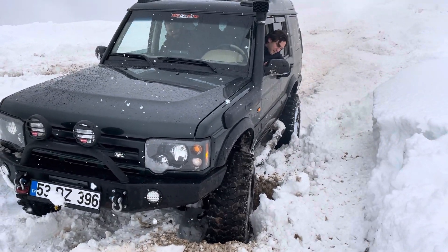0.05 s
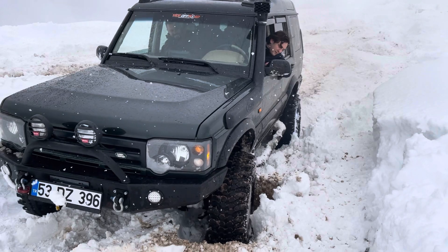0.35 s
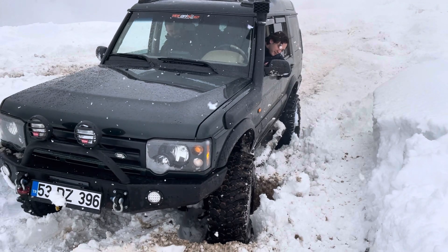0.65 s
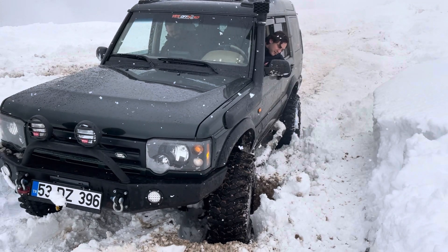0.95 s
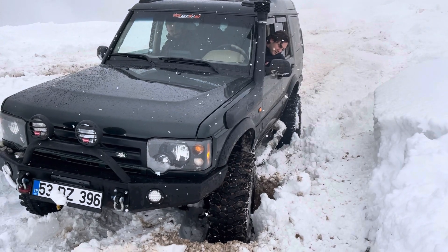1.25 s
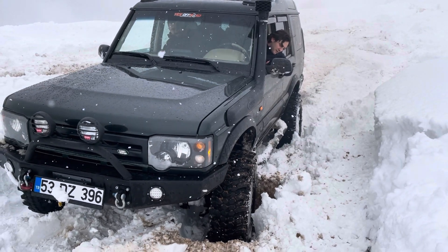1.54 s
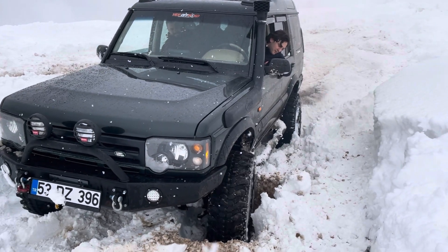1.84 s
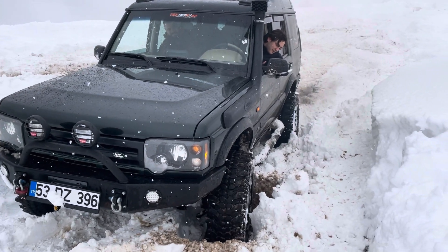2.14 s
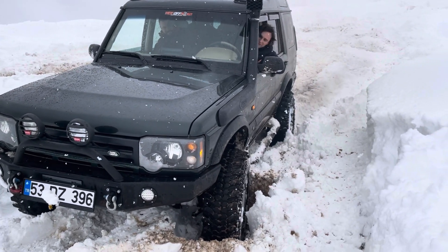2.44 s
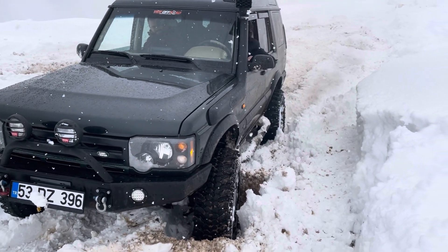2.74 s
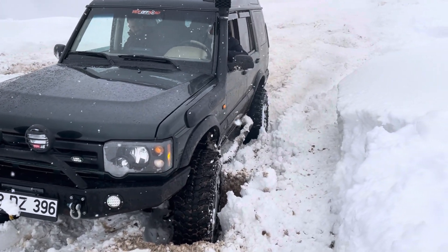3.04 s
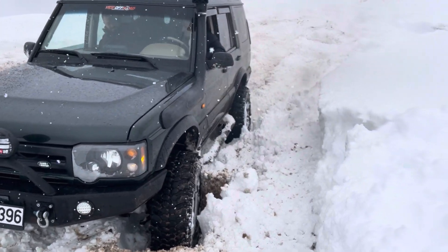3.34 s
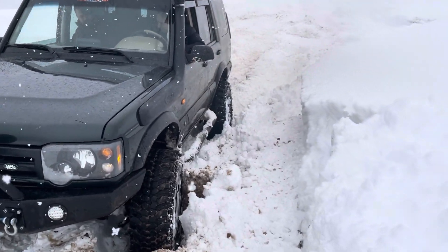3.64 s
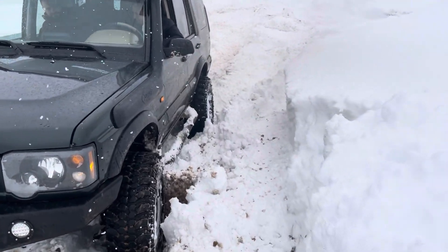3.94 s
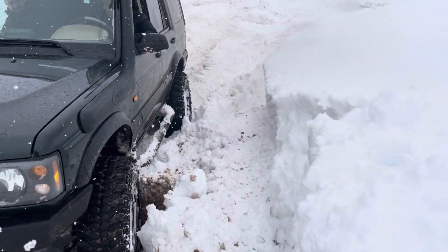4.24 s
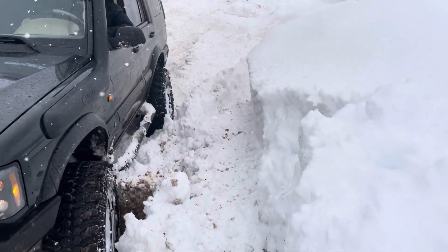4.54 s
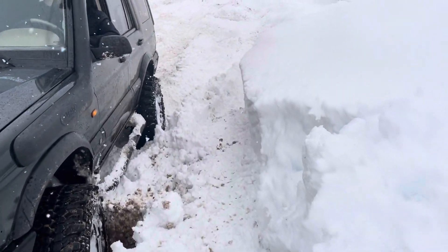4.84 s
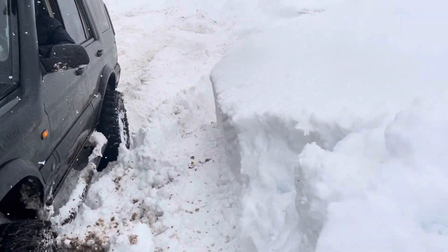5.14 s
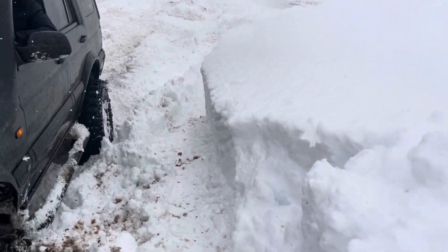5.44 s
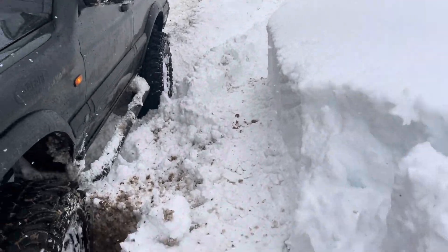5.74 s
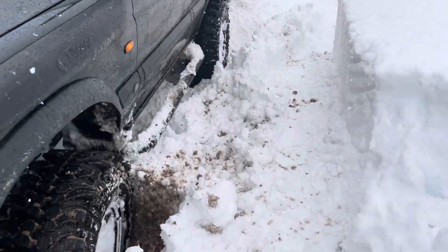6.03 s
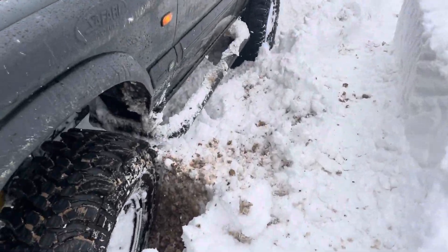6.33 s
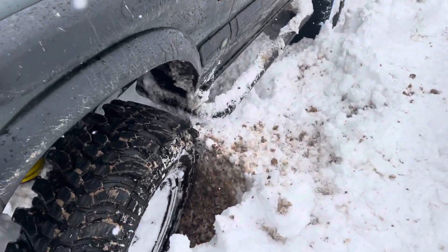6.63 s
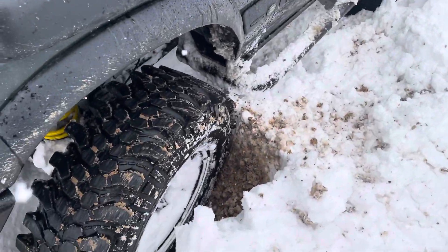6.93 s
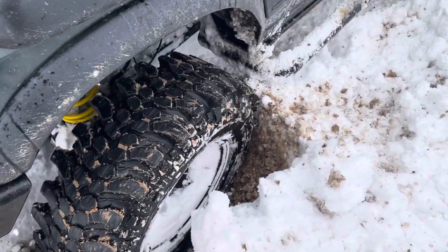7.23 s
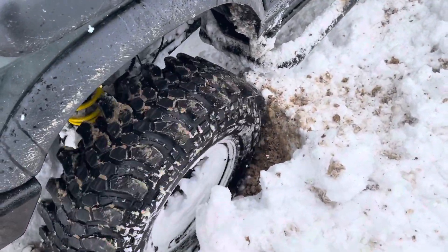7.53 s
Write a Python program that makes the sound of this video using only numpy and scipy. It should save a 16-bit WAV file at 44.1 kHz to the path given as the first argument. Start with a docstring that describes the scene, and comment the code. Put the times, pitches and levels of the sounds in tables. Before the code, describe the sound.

Close to the front of an off-road vehicle in snow, a diesel engine gives a short rev and then a slower, higher one, with gritty tyre spray and knocks underneath. It drops to a loping, clattering idle with scattered soft thuds and a few light ticks. As the microphone nears the front wheel, a last long rev builds with a deep boom, a faint hoarse whine, spinning tyres and heavy thumps of thrown snow.

```python
"""A five-cylinder diesel four-wheel-drive is stuck in deep snow. It is revved twice: the exhaust booms at
the firing rate, the block knocks, fan and intake hiss, and spinning tyres throw snow at the underbody.
It runs down with a brief whine, sags twice and idles, with one faint touch of the accelerator, while the
two-port microphone moves from the grille to the wing. Last it pulls long and hard, tyres spinning
again and clods thumping, as the microphone moves on towards the front wheel arch."""
import sys
import numpy as np
from scipy import signal
from scipy.fft import rfft, irfft, next_fast_len
from scipy.io import wavfile
from scipy.ndimage import uniform_filter1d, map_coordinates

SR = 44100
rng = np.random.default_rng(int(sys.argv[2]) if len(sys.argv) > 2 else 0)


def transcribe(u):
    """Save the signal u as a 16-bit wav file named by the first command-line argument.

    u: samples, shape (n,) or (channels, n), limited to [-1, 1]; the rate is SR.
    q: integer samples, one column per channel.
    """
    v = np.clip(np.atleast_2d(u).T, -1, 1)
    q = np.round(v * 32767).astype(np.int16)
    wavfile.write(sys.argv[1], SR, q)


N = 334278
TIME = np.arange(N) / SR

# accelerator presses: down t/s, up t/s, goal firing rate f/Hz, rise time constant t/s
PRESSES = [(-.087, .358, 77.435, .042), (.991, 1.867, 91.254, .733), (4.071, 4.706, 34.949, .049),
           (5.864, 7.7, 70.641, .488)]
# idle sags: t/s, depth f/Hz
SAGS = [(2.426, 6.319), (2.849, 3.051)]
IDLE_HZ, COAST_S, FRICTION_HZ, SAG_S = 31.654, .287, 4.99, .135


def firing_rate():
    """Firings per second: each press pulls the speed towards its goal, friction brings it back to idle."""
    above_idle = np.zeros(N)
    for down, up, goal_hz, rise_s in PRESSES:
        gained = (goal_hz - IDLE_HZ) * (1 - np.exp(-np.clip(TIME - down, 0, up - down) / rise_s))
        above_idle = np.maximum(above_idle, (gained + FRICTION_HZ) * release(up, COAST_S) - FRICTION_HZ)
    return IDLE_HZ + above_idle - sum(depth * bump(s, SAG_S) for s, depth in SAGS)


# per press: share of full load
PRESS_LOADS = [1, 0.77, 0.01, 0.72]
LOAD_LEAD_S, LOAD_ATTACK_S, LOAD_RELEASE_S = 0.05, 0.045, 0.34
GOVERNOR_LAG_S, GOVERNOR_LOAD_PER_HZ = .19, 0.032
OVERRUN_HZ_PER_S = 55


def engine_state(rate):
    """Level-law inputs. Fuel comes on fast, ebbs slowly, puffs after a sag and is cut by fast slowing."""
    load = sum(share * progress(down - LOAD_LEAD_S, down + LOAD_ATTACK_S) * release(up, LOAD_RELEASE_S)
               for (down, up, *_), share in zip(PRESSES, PRESS_LOADS))
    load += sum(GOVERNOR_LOAD_PER_HZ * depth * bump(s + GOVERNOR_LAG_S, SAG_S / 2) for s, depth in SAGS)
    slowing = -np.gradient(rate) * SR / OVERRUN_HZ_PER_S
    overrun = uniform_filter1d(np.clip(slowing, 0, 1), size=3000)
    octaves = np.log2(rate / IDLE_HZ)
    return np.array([np.ones(N), octaves, load, overrun, progress(*TO_WING_S), progress(*TO_ARCH_S)])


def law_gain(law, state):
    """Gain from a law's dB terms: at idle, per octave of speed, full load, overrun, wing, arch."""
    return amp(np.dot(law, state))


# silencer response: f/Hz, level/dB
SILENCER = [(25, -46), (33, -37), (41, -31.5), (48, -22.5), (57, -17), (65, -13), (74, -13.5), (83, -19),
            (95, -23.5), (105, -24), (114, -29.5), (135, -33), (157, -36.5), (190, -72), (260, -50.5),
            (330, -64.5)]
# cylinder strength in firing order: level/dB
CYLINDER_DB = [-0.6, -1.4, -0.8, -0.1, -2.2]
# level laws, terms as in law_gain: level/dB
BOOM_LAW_DB = (-12, 2, 12.5, -8, 4, -1)
RUMBLE_LAW_DB = (-37, -0.5, 8, 1.5, -0.5, 8)


def exhaust(rate, turn, idle, state, lope=1.18, waver_db=1.35, upper_db=-6, fourth_db=-5):
    """Firing orders swell through the silencer's resonance; unequal cylinders make the idle lope."""
    orders = np.arange(1, 9)[:, None]
    load = state[2]
    order_db = along(SILENCER, orders * rate)
    order_db += upper_db * load * (orders > 2)  # load feeds mainly the two lowest orders
    order_db += fourth_db * idle * (orders == 4)
    boom = np.sqrt(2) * np.sum(amp(order_db) * np.cos(2 * np.pi * orders * (turn - .48)), axis=0)
    cylinder_db = np.interp(turn, np.arange(len(CYLINDER_DB)), CYLINDER_DB, period=len(CYLINDER_DB))
    uneven = amp(idle * lope * cylinder_db + (idle - 0.4) * waver_db * wobble(11))
    rumble_spectrum = [(15, -34), (35, 0), (52, 13.5), (76, 16), (120, 3), (170, -16), (300, -81)]
    rumble = coloured(rng.standard_normal(N), rumble_spectrum)
    return law_gain(BOOM_LAW_DB, state) * boom * uneven + law_gain(RUMBLE_LAW_DB, state) * rumble


# growl spectra: f/Hz, level/dB
GROWL_GRILLE_IDLE = [(100, -38), (160, 4), (185, -8.5), (220, 0), (275, 3), (350, -6), (390, -5), (520, -3),
                     (760, -4), (900, -13), (1250, -63.5)]
GROWL_GRILLE_REVVED = [(88, -11.5), (150, -3.5), (188, -5.5), (242, -1), (376, -6.5), (439, -16),
                       (562, -8.5), (740, -11.5), (950, -20.5), (1240, -31), (2090, -120)]
GROWL_SIDE_IDLE = [(100, -22), (160, -2), (220, -0.5), (380, -2.5), (480, -5), (740, -10.5), (900, -27.5),
                   (1250, -73)]
GROWL_SIDE_REVVED = [(100, -18), (160, 0), (192, -7), (222, 1), (290, 0.5), (370, -6), (415, -6),
                     (653, -11), (717, -12.5), (782, -16), (950, -34), (1240, -45), (2090, -120)]
# level law: level/dB
GROWL_LAW_DB = (-40.5, 6, 3, 2.5, 3, 9.5)


def body_growl(rate, turn, idle, state):
    """Each firing shakes the body; the floor pan's drone joins in above idle."""
    shakes = firings(turn, CYLINDER_DB, delay=.13, spread_s=.0015, decay_s=.017,
                     scatter_db=-.5, jitter_s=.0004)
    growl = chuff(shakes, share=0.22) + amp(-14 - 3.1 * idle) * cycle_rasp(turn)
    growl = voiced(growl, rate, GROWL_GRILLE_IDLE, GROWL_GRILLE_REVVED, GROWL_SIDE_IDLE, GROWL_SIDE_REVVED)
    drone = grille_to_side(amp(-14), amp(-2)) * (1 - idle) * floor_drone(rate, turn)
    return law_gain(GROWL_LAW_DB, state) * (growl + drone)


def cycle_rasp(turn, points=400):
    """Unequal cylinders repeat one ragged pressure pattern every five firings."""
    pattern = irfft(np.exp(2j * np.pi * rng.random(points // 2 + 1)), points)
    return unit(map_coordinates(pattern, [turn / len(CYLINDER_DB) % 1 * points], mode="grid-wrap"))


# uneven orders: multiple of the firing rate, level/dB
DRONE_ORDERS = [(3.2, -6), (3.8, 3.5), (4, -1), (4.4, -7), (4.6, -8), (5, -4), (5.6, -8)]
# floor pan modes: f/Hz, half width f/Hz, level/dB
FLOOR_MODES = [(218, 10, -1), (250, 18, -1), (300, 16, -5), (385, 12, -10)]


def floor_drone(rate, turn):
    """Uneven firing orders sing out in turn as they climb through the floor pan's resonances."""
    hz = np.arange(600)
    power = sum(amp(db) ** 2 / (1 + ((hz - centre) / width) ** 4) for centre, width, db in FLOOR_MODES)
    wavering = lambda k: amp(3 * wobble(6)) * np.sin(2 * np.pi * k * turn + .35 * wobble(8))
    return sum(np.interp(k * rate, hz, np.sqrt(2 * power)) * amp(db) * wavering(k)
               for k, db in DRONE_ORDERS)


# knock spectra: f/Hz, level/dB
KNOCK_GRILLE_IDLE = [(500, -52), (850, -30), (981, -7), (1080, -6.5), (1540, -4), (1720, -12.5),
                     (2000, -27.5), (2600, -59), (4400, -120)]
KNOCK_GRILLE_REVVED = [(500, -28), (850, -17), (927, -12.5), (1090, 7.5), (1190, 0), (1370, 2), (1500, 8),
                       (2100, -12.5), (2730, -49), (4620, -120)]
KNOCK_SIDE_IDLE = [(600, -45), (900, -5), (1100, -5), (1300, -0.5), (1550, -5), (1900, -16), (2500, -68)]
KNOCK_SIDE_REVVED = [(500, -31), (850, -1), (1110, 5), (1340, 0), (1590, -5), (2100, -4), (2730, -38),
                     (4620, -120)]
# knock per cylinder in firing order: level/dB
CYLINDER_KNOCK_DB = [2.5, 8, 5.5, 5, 6]
# level law: level/dB
KNOCK_LAW_DB = (-40, 3, 1.5, -3.5, -2.5, 6.5)
SCREEN_AT_S, SCREEN_S, SCREEN_DB = 5.72, 0.33, -3.5


def block_knock(rate, turn, idle, state):
    """Firings ring the block: separate clacks at idle, a blur when revved or with the fuel cut."""
    overrun = state[3]
    crisp = idle * (1 - overrun)
    bangs = firings(turn, CYLINDER_KNOCK_DB, delay=.08, spread_s=.0013, decay_s=.011,
                    scatter_db=.8, jitter_s=.0004)
    knock = chuff(bangs, share=0.33 + 0.27 * crisp)
    knock = voiced(knock, rate, KNOCK_GRILLE_IDLE, KNOCK_GRILLE_REVVED, KNOCK_SIDE_IDLE, KNOCK_SIDE_REVVED)
    knock = amp(-3.3 * crisp) * knock + amp(-6 + 5.3 * crisp) * casting_clatter(turn)
    screen = amp(SCREEN_DB * bump(SCREEN_AT_S, SCREEN_S))  # the wing briefly screens the block
    return law_gain(KNOCK_LAW_DB, state) * screen * knock


# casting modes: f/Hz, grille level/dB, wing level/dB, t60/s
CASTING_MODES = [(756.4, -11.5, -10.5, 0.099), (1155, -2, -5.5, 0.027), (1281, -0.5, -2.5, 0.027),
                 (1359, -5, 0.5, 0.025), (1504, -2.5, -11, 0.06), (1694, -6, -36, 0.028),
                            (2258, -17.5, -12, 0.035), (3213, -21, -13.5, 0.031),
                 (4350, -23.5, -16.5, 0.03)]


def casting_clatter(turn, attack_s=0.003):
    """Every firing rings the modes of the castings, each time at a slightly different pitch."""
    t, clatter = TIME[:SR // 12], 0
    for hz, grille_db, wing_db, t60 in CASTING_MODES:
        ring = amp(-60 * t / t60) * np.exp(2j * np.pi * hz * t) * (1 - np.exp(-t / attack_s))
        blows = pulses(turn, CYLINDER_KNOCK_DB, delay=.055, scatter_db=1.6, jitter_s=.0004)
        blows *= amp(grille_to_side(grille_db, wing_db))
        detune = np.exp(3j * wobble(30))
        clatter += (signal.oaconvolve(blows, ring)[:N] * detune).imag
    return steady(clatter)


# hiss spectra: f/Hz, level/dB
HISS_GRILLE_IDLE = [(1120, -19), (1900, -3), (2260, 1), (2800, -4.5), (3220, -5.5), (4300, -6), (5590, -14),
                    (7280, -16.5), (8160, -45), (8520, -90), (9390, -29), (10100, -23), (12200, -11.5),
                    (15500, -35)]
HISS_GRILLE_REVVED = [(1120, -22), (1900, -22), (2060, 1), (2650, 2.5), (6960, -10.5), (8160, -16.5),
                      (8520, -78), (9060, -84), (9470, -30.5), (10200, -14), (12700, -12.5), (15500, -22)]
HISS_SIDE_IDLE = [(1120, -18), (1900, 1.5), (2260, -0.5), (2800, -5), (3220, -4), (3650, -9.5), (4350, -4),
                  (4800, -11.5), (5590, -16.5), (7280, -21), (8160, -56), (8520, -84), (9390, -26),
                  (10100, -21), (12200, -11), (15500, -37)]
HISS_SIDE_REVVED = [(1120, -27), (1900, -8), (2650, -0.5), (2920, -6), (4950, -6.5), (5640, -16.5),
                    (7090, -13), (8300, -31.5), (8670, -84), (8980, -39), (10700, -16), (12500, -17.5),
                    (15500, -26)]
# level law: level/dB
HISS_LAW_DB = (-49.5, 4.5, 1.53, -1, 3, 7)


def intake_hiss(rate, turn, idle, state):
    """Fan and intake rush in puffs; above them the injectors tick just before each firing."""
    puffs = firings(turn, CYLINDER_DB, delay=.07, spread_s=.0046, decay_s=.005,
                    scatter_db=1, jitter_s=.0008)
    rush = chuff(puffs, share=0.26 + 0.17 * idle)
    ticks = firings(turn, CYLINDER_DB, delay=-.02, spread_s=.0051, decay_s=.002,
                    scatter_db=2.7, jitter_s=.0007)
    injectors = chuff(ticks, share=0.21 + 0.23 * idle)
    hiss = crossover(rush, injectors, hz=8800)
    hiss = voiced(hiss, rate, HISS_GRILLE_IDLE, HISS_GRILLE_REVVED, HISS_SIDE_IDLE, HISS_SIDE_REVVED)
    return law_gain(HISS_LAW_DB, state) * hiss


# wheelspins: start t/s, end t/s, spray level/dB, clod level/dB
WHEELSPINS = [(-.2, .33, -48.5, -31.5), (1.283, 1.947, -48.5, -35.5), (6.071, 7.7, -48.5, -31)]
# thrown snow spectra: f/Hz, level/dB
SPRAY_SPECTRUM = [(1000, -26), (2500, -3), (4800, 1), (7200, -3), (8300, -40), (9000, -67.5), (10300, -17),
                  (12800, 0), (15500, -22)]
CLOD_SPECTRUM = [(70, -26), (150, 7.5), (300, 7.5), (600, -14.5), (1200, -23.5), (2500, -72.5)]


def tyres():
    """Spinning tyres fling a gritty spray and pelt the wheel arch with small clods."""
    spray_gain, clod_gain = 0, 0
    for start, end, spray_db, clod_db in WHEELSPINS:
        spin = gate(start, end, attack_s=.048, release_s=.16)
        spray_gain += amp(spray_db) * spin
        clod_gain += amp(clod_db) * spin
    spray = coloured(grains(per_s=3000, spread_db=3), SPRAY_SPECTRUM) * amp(3 * wobble(17))
    clods = coloured(grains(per_s=260, spread_db=0.8), CLOD_SPECTRUM)
    return spray_gain * spray + clod_gain * clods


# clod and suspension contacts: t/s, peak level/dB, f/Hz, t60/s
CONTACTS = [(.508, -22, 286, 0.04), (.577, -29.5, 480, 0.021), (1.279, -10.5, 195, 0.015),
            (1.583, -22, 372, 0.048), (1.779, -17, 620, 0.011), (1.881, -18, 170.5, 0.11),
            (2.138, -21.5, 126, 0.087), (2.915, -17, 60.6, 0.086), (3.23, -27.5, 115, .08),
            (3.852, -19, 700, 0.0036), (4.437, -22, 172, .04), (4.529, -28, 420, 0.046),
            (5.089, -27, 306, .06), (5.445, -14.5, 82.4, 0.15), (5.642, -25, 760, .015),
            (6.899, -18.5, 407, 0.056), (7.071, -8, 450, .05), (7.080, -8.5, 365, .02),
            (7.403, -7, 373, 0.066), (7.444, -8, 378, 0.026)]
# underbody modes: f/Hz, t60/s
UNDERBODY_MODES = [(62, 0.23), (119, 0.092), (218, 0.12), (365, 0.15), (478, 0.11), (640, 0.056),
                   (990, 0.059), (1306, 0.11)]
UNDERBODY_DB, FALLOFF_DB_PER_OCTAVE, FULL_CONTACT_S = -8.5, 11.5, 0.013


def underbody_thumps():
    """Each pitched contact rings the nearest underbody modes; very short ones move them less."""
    thumps = sum(blow(*contact, breadth=.6, rough=.3, attack_s=.0003) for contact in CONTACTS)
    for s, db, contact_hz, contact_s in CONTACTS:
        push = min(contact_s / FULL_CONTACT_S, 1)
        for hz, t60 in UNDERBODY_MODES:
            mode_db = db + UNDERBODY_DB - FALLOFF_DB_PER_OCTAVE * abs(np.log2(hz / contact_hz))
            thumps += push * blow(s, mode_db, hz, t60, breadth=.44, rough=2, attack_s=.0024)
    return thumps


# showers of grit: start t/s, end t/s, level/dB
GRIT_SHOWERS = [(0, .33, -38.5), (0.417, 0.453, -39), (0.511, 0.592, -32.5), (1.766, 1.846, -32),
                (7.414, 7.472, -22.5)]
# rattle spectrum: f/Hz, level/dB
GRIT_SPECTRUM = [(130, -22), (300, 7.5), (760, 2), (1000, -8.5), (1700, -6.5), (3000, -34), (7000, -68.5)]


def chassis_rattle():
    """Grit and frozen lumps hit the chassis in short showers."""
    gain = sum(amp(db) * gate(start, end, attack_s=.0087, release_s=.018)
               for start, end, db in GRIT_SHOWERS)
    return gain * coloured(grains(per_s=400, spread_db=1.5), GRIT_SPECTRUM)


# ticks: t/s, peak level/dB, f/Hz, t60/s
LIGHT_TICKS = [(0.799, -39, 5900, 0.02), (4.329, -34, 3350, .04), (4.472, -35.5, 3320, .04),
               (4.617, -36.5, 3300, .04), (4.762, -35.5, 3250, .045)]


def light_ticks():
    """A few small, high ticks ring briefly."""
    return sum(blow(*tick, breadth=.14, rough=2, attack_s=.003) for tick in LIGHT_TICKS)


# panel modes: f/Hz, half width f/Hz, level/dB
PANEL_MODES = [(384.6, 6.7, -48), (450, 11, -63)]


def panel_hum(rate, turn, waver_db=0.5):
    """Upper firing orders hum wherever they meet a panel's resonance."""
    hum = 0
    for k in range(8, 14):
        response = sum(amp(db) / (1 + ((k * rate - hz) / width) ** 2) for hz, width, db in PANEL_MODES)
        waver = amp(waver_db * wobble(5.28))
        hum += response * waver * np.sqrt(2) * np.sin(2 * np.pi * (k * turn + rng.random()))
    return hum


def gear_rattle(rate, turn, rattle_db=-51, ring_hz=3250):
    """When the engine sags below idle, slack gears chatter with every firing."""
    slack = np.clip((IDLE_HZ - rate) / 6, 0, 1) ** 2
    bursts = firings(turn, CYLINDER_DB, delay=.12, spread_s=.0018, decay_s=.006,
                     scatter_db=1.5, jitter_s=.0008)
    return amp(rattle_db) * slack * ringing(bursts * rng.standard_normal(N), ring_hz, breadth=0.25)


# whines: start t/s, end t/s, level/dB, bandwidth over pitch
METAL_WHINES = [(2.14, 2.25, -54, .03), (6.66, 7.45, -49, .065)]


def metal_whine(hz=2670):
    """A metal resonance squeals briefly as the engine runs down and sings hoarsely under load."""
    return sum(amp(db) * gate(start, end, attack_s=.05, release_s=.04)
               * ringing(rng.standard_normal(N), hz, breadth) for start, end, db, breadth in METAL_WHINES)


def pump(hz=216.6, db=-48, waver_db=2.5):
    """A small electric motor, probably the fuel pump, hums on whatever the engine's speed."""
    gain = amp(db + waver_db * wobble(4.17))
    return gain * np.sqrt(2) * np.sin(2 * np.pi * hz * TIME + .25 * wobble(4.5))


# port difference over port sum: f/Hz, level/dB
WIDTH_GRILLE = [(60, -36), (100, -8.5), (180, -18), (310, -17.5), (550, -8.5), (950, -6.5), (1650, -2),
                (2860, 1.5), (4970, -7.5), (8640, 16), (15000, -18.5)]
WIDTH_SIDE = [(60, -20), (100, -15.5), (180, -12.5), (310, -11.5), (550, -4), (950, 0), (1650, 4),
              (2860, 0), (4970, -7), (8640, 16), (15000, -20)]
# direct sound in that difference: f/Hz, power share
DIRECT_SHARE = [(200, 0.54), (1200, 0.33), (2500, 1), (5000, .3), (12000, .4)]
# left minus right: f/Hz, level/dB
BALANCE = [(60, -1), (130, 1), (290, -1), (640, 0), (1410, -3.5), (3100, 5), (6820, 0), (15000, -0.5)]
TO_WING_S, TO_ARCH_S = (3.03, 5.34), (6.16, 8.47)  # microphone moves: start, end


def microphone(direct, diffuse):
    """Direct sound reaches the left port first, so the ports' difference leads by a quarter cycle."""
    share = lambda hz: np.clip(along(DIRECT_SHARE, hz), 0, 1)
    difference = filtered(direct, lambda hz: 1j * np.sqrt(share(hz)))
    difference += filtered(diffuse, lambda hz: np.sqrt(1 - share(hz)))
    difference = grille_to_side(equalised(difference, WIDTH_GRILLE), equalised(difference, WIDTH_SIDE))
    ports = np.array([direct + difference, direct - difference])
    return filtered(ports, lambda hz: amp(np.outer([.5, -.5], along(BALANCE, hz))))


def grille_to_side(grille, side):
    """Cross-fade as the microphone moves from the grille to the wing."""
    moved = progress(*TO_WING_S)
    return grille * (1 - moved) + side * moved


def voiced(x, rate, grille_idle, grille_revved, side_idle, side_revved, from_hz=28.8, span_hz=19.5):
    """Colour x by engine speed and microphone position."""
    revved = np.clip((rate - from_hz) / span_hz, 0, 1)
    blend = lambda slow, fast: (1 - revved) * coloured(x, slow) + revved * coloured(x, fast)
    return grille_to_side(blend(grille_idle, grille_revved), blend(side_idle, side_revved))


def pulses(turn, cylinder_db, delay, scatter_db, jitter_s):
    """One impulse per firing, sized by its cylinder; delay is in firing intervals."""
    index = np.arange(int(turn[-1]))
    chance = rng.standard_normal((len(index), 2))
    at_s = np.interp(index + delay, turn, TIME) + jitter_s * chance[:, 0]
    size = amp(np.take(cylinder_db, index, mode="wrap") + scatter_db * chance[:, 1])
    return np.bincount(np.clip(at_s * SR, 0, N - 1).astype(int), size, N)


def firings(turn, cylinder_db, delay, spread_s, decay_s, scatter_db, jitter_s):
    """One rounded, decaying burst per firing."""
    shape = lambda hz: np.exp(-2 * (np.pi * hz * spread_s) ** 2) / (1 + 2j * np.pi * hz * decay_s)
    return steady(filtered(pulses(turn, cylinder_db, delay, scatter_db, jitter_s), shape))


def chuff(bursts, share):
    """Two independent noises with a share of their power in the bursts."""
    share = np.clip(share, 0, 1)
    return rng.standard_normal((2, N)) * np.sqrt(1 - share + share * bursts ** 2)


def blow(s, db, hz, t60, breadth, rough, attack_s):
    """A damped burst at time s: a sine plus a noise band around the same pitch."""
    t = TIME[:SR // 3]
    ring = np.sin(2 * np.pi * hz * t) + rough * ringing(rng.standard_normal(len(t)), hz, breadth)
    onset = 1 - np.exp(-(t / (attack_s + .5 / hz)) ** 2)
    burst = ring * onset * amp(-60 * t / t60)
    return np.pad(amp(db) * burst / np.abs(burst).max(), (round(s * SR), N))[:N]


def grains(per_s, spread_db):
    """Impacts at random moments, most small and a few large."""
    when, chance, sign = rng.random((int(per_s * N / SR), 3)).T
    size = amp(-spread_db * np.log(np.maximum(chance, .004)))
    return np.bincount((when * N).astype(int), size * np.sign(sign - .5), N)


def ringing(x, hz, breadth):
    """x through a steep-skirted resonance, at rms 1; breadth is bandwidth over pitch."""
    peak = signal.iirpeak(min(hz, SR / 3), 1 / min(breadth, 1.2), SR)
    return unit(signal.lfilter(*peak, signal.lfilter(*peak, x)))


def crossover(low, high, hz):
    """One sound below hz, another above."""
    part = lambda x, kind: signal.sosfilt(signal.butter(4, hz, kind, fs=SR, output="sos"), x)
    return part(low, "lowpass") + part(high, "highpass")


def filtered(x, response):
    """x through a frequency response."""
    size = next_fast_len(N + SR // 8, True)
    gain = np.asarray(response(np.fft.rfftfreq(size, 1 / SR)), np.complex64)
    return irfft(rfft(np.float32(x), size) * gain, size)[..., :N]


def equalised(x, spectrum):
    """x through a curve of (f/Hz, level/dB) points."""
    return filtered(x, lambda hz: amp(along(spectrum, hz)))


def coloured(x, spectrum):
    """x equalised, at rms 1."""
    return unit(equalised(x, spectrum))


def along(points, hz):
    """Interpolate (f/Hz, value) points on a log axis."""
    freqs, values = np.transpose(points)
    return np.interp(np.log(hz + 1), np.log(freqs + 1), values)


def wobble(knots_per_s):
    """A smooth random curve."""
    coarse = TIME[::64]
    knots = rng.standard_normal(int(N * knots_per_s / SR) + 4)
    return np.interp(TIME, coarse, map_coordinates(knots, [coarse * knots_per_s]))


def progress(start, end):
    """Linear ramp from 0 at start to 1 at end."""
    return np.clip((TIME - start) / (end - start), 0, 1)


def release(end, release_s):
    """1 until end, then exponential decay."""
    return np.exp(-np.maximum(TIME - end, 0) / release_s)


def gate(start, end, attack_s, release_s):
    """Ramp up, hold, decay."""
    return progress(start, start + attack_s) * release(end, release_s)


def bump(s, width_s):
    """A smooth swell to 1 around time s."""
    return np.exp(-((TIME - s) / width_s) ** 2)


def steady(x):
    """Hold the running rms at 1."""
    power = uniform_filter1d(uniform_filter1d(x ** 2, size=7000), size=4000)
    return x / np.sqrt(abs(power) + 1e-14)


def unit(x):
    """Scale to rms 1."""
    return x / np.sqrt(np.mean(x ** 2) + 1e-20)


def amp(db):
    """Decibels to gain."""
    return 10 ** (np.asarray(db) / 20)


def scene():
    """One crankshaft times the engine layers; whine, pump, snow and impacts join at the microphone."""
    rate = firing_rate()
    turn = np.cumsum(rate) / SR  # firings so far
    idle = np.clip((60 - rate) / 25, 0, 1)  # 1 at idle, 0 when revved
    state = engine_state(rate)
    running = rate, turn, idle, state
    direct, diffuse = body_growl(*running) + block_knock(*running) + intake_hiss(*running)
    direct += exhaust(*running) + idle * panel_hum(rate, turn) + gear_rattle(rate, turn)
    direct += metal_whine() + pump()
    direct += tyres() + underbody_thumps() + light_ticks() + chassis_rattle()
    return microphone(direct, diffuse)


def record(dry):
    """Round off the highest peaks and limit the bandwidth."""
    ceiling, top_hz = .98, 15700
    rounded = dry / (1 + (dry / ceiling) ** 8) ** (1 / 8)
    return filtered(rounded, lambda hz: hz < top_hz)


dry = scene()
out = record(dry)
transcribe(out)
```